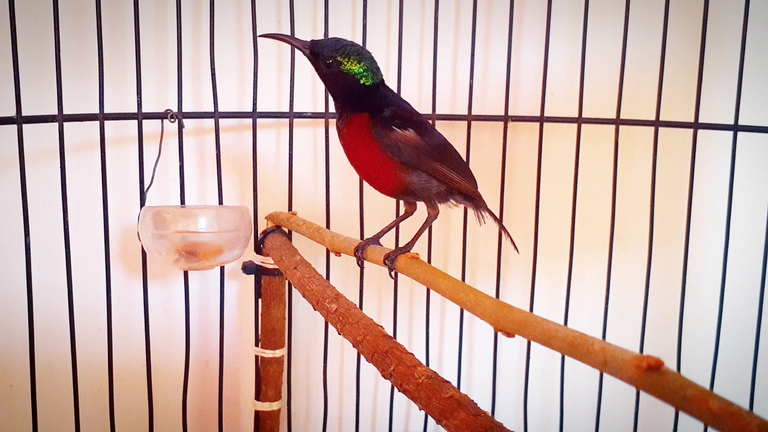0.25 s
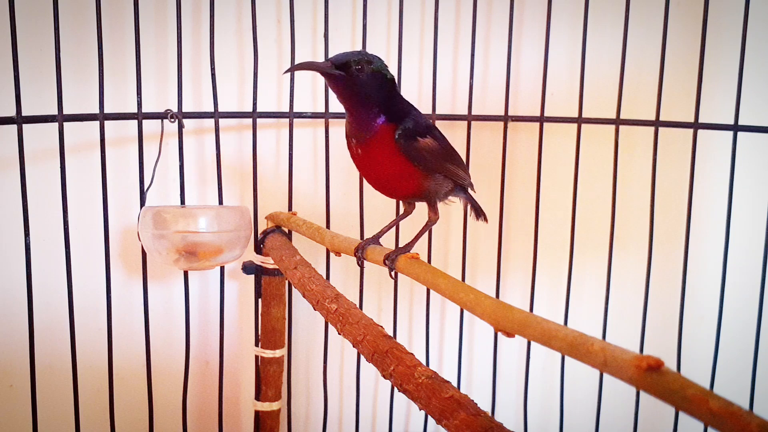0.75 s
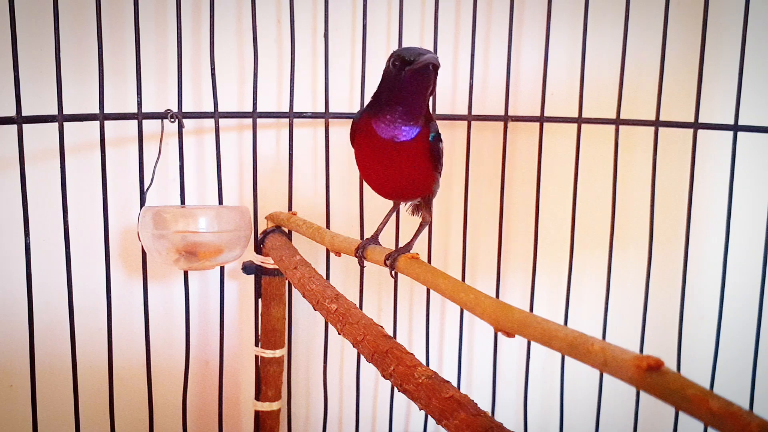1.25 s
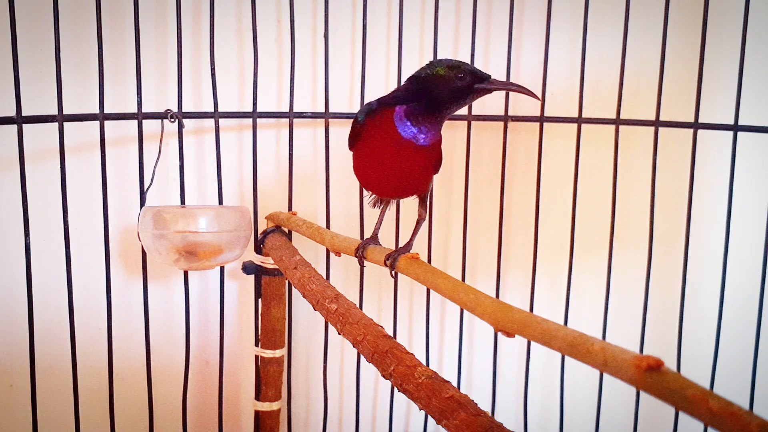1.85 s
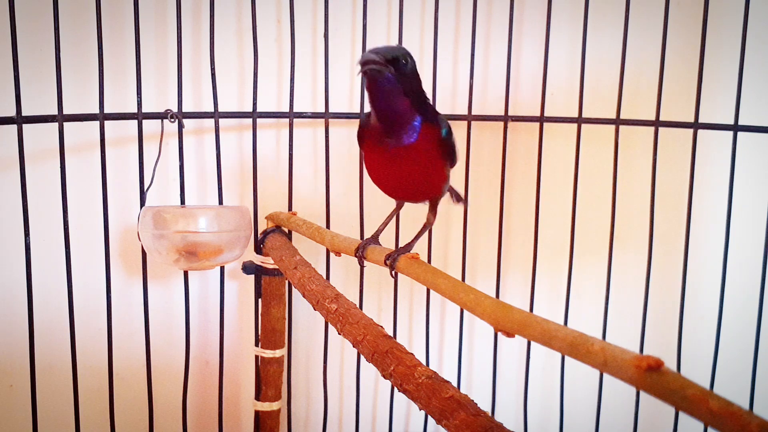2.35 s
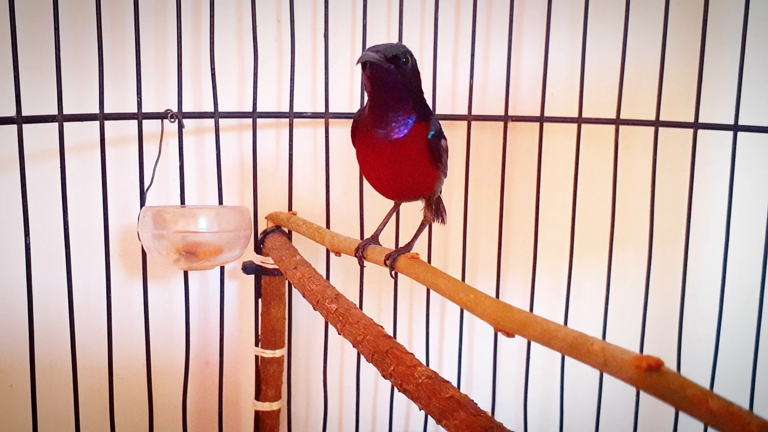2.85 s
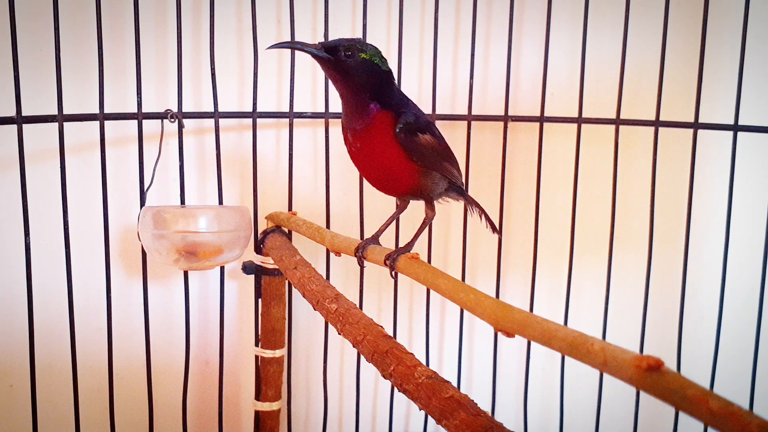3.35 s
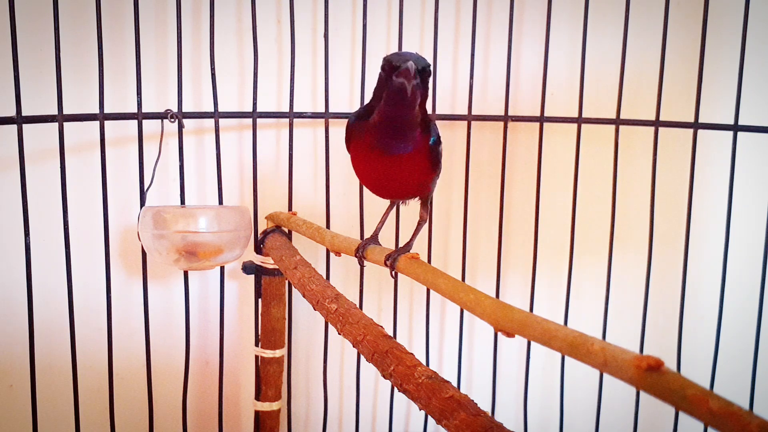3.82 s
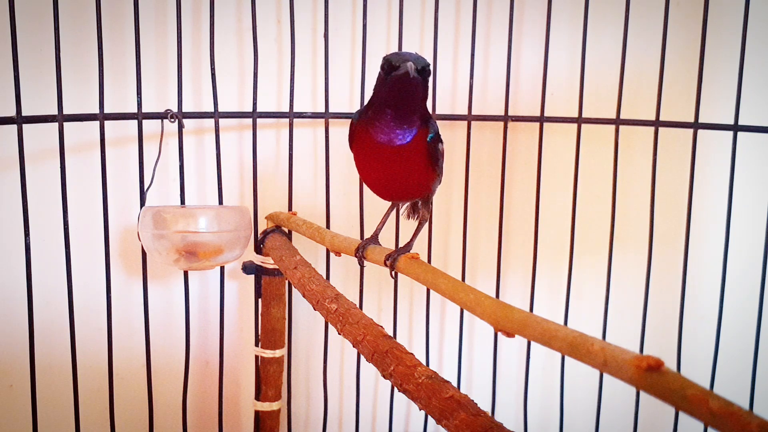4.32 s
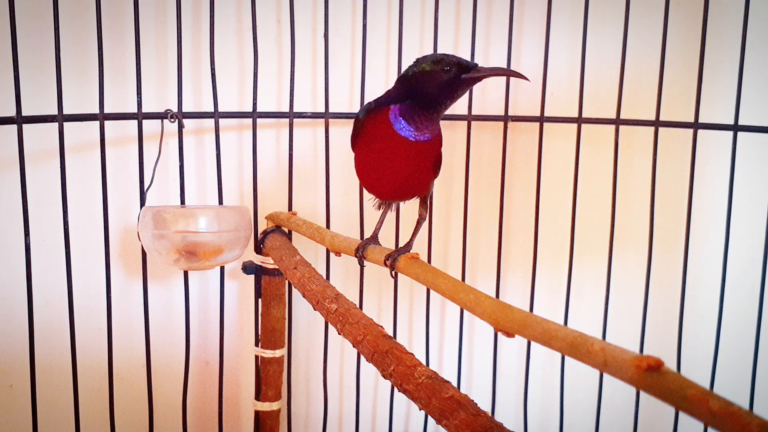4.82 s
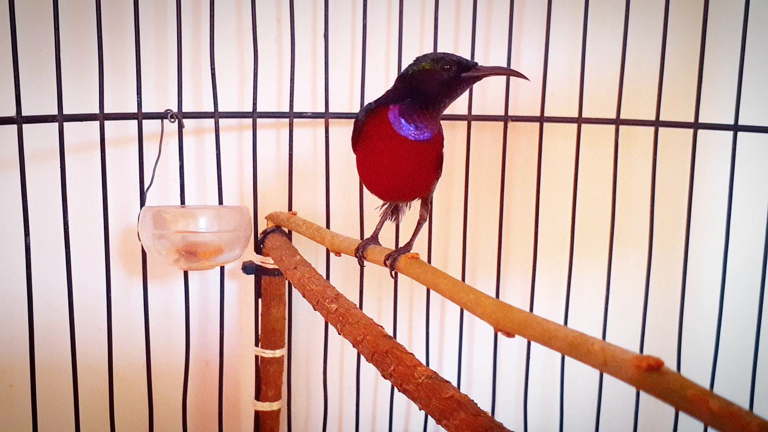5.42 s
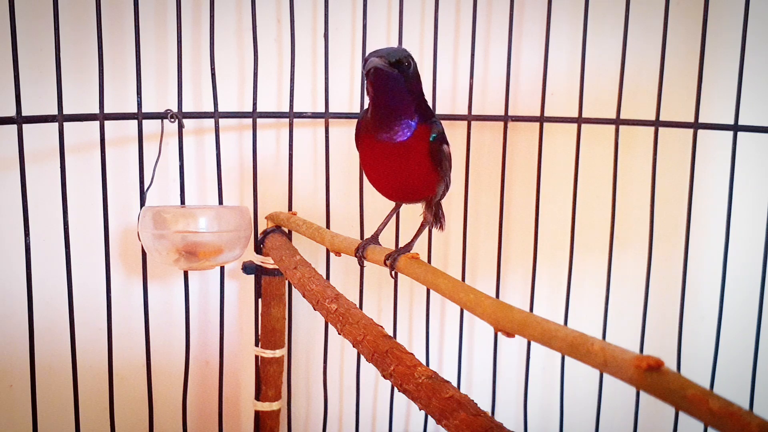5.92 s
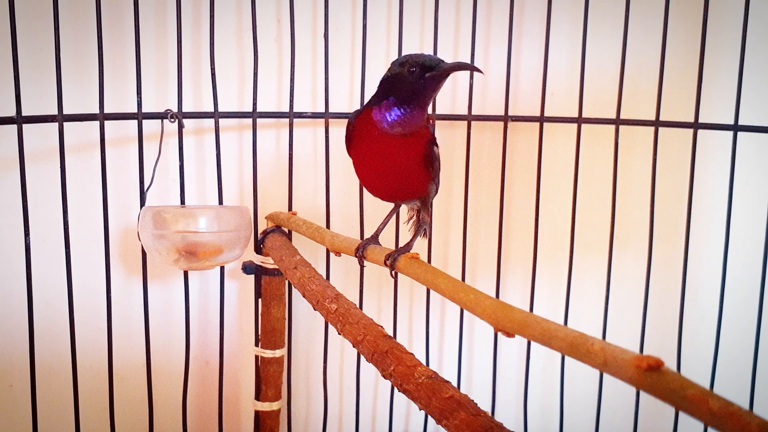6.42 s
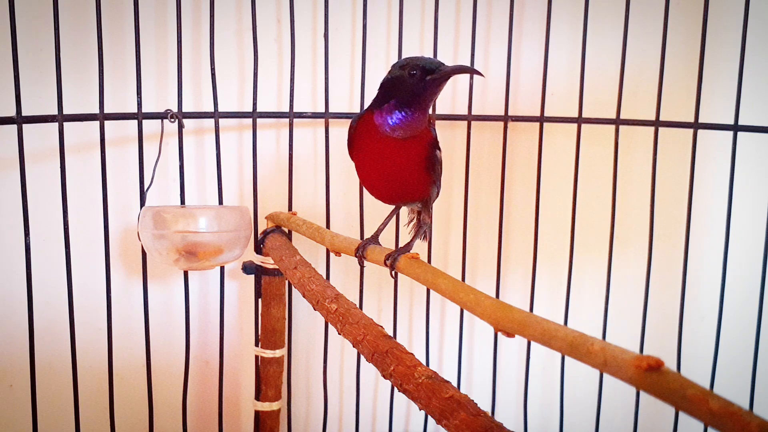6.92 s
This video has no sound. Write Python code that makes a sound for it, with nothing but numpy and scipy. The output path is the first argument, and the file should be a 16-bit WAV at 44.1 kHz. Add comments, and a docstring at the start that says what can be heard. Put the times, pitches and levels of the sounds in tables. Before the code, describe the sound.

A quiet small room, with a caged sunbird very close to the microphone. Soft low rumble swells and ebbs beneath a faint wavering hum, street noise and thin hiss. From 0 to 2 s, far outdoor birds twitter faintly, with four quick falling chirps at 0.4-0.8 s, blurred by echoes. At 0.9 s the sunbird gives a loud, piercing squeal of about 0.2 s, rough and two-voiced, splitting midway, arching upward and dropping off. A near-identical squeal comes at 2.3 s. At 3.75 and 3.95 s come two even shorter, bright whistles, about 0.1 s each, shooting steeply upward. A third squeal sounds at 5.5 s. Each call leaves a short, faint room ring. Dull, muffled knocks are scattered throughout, barely audible. From 5.9 s to the end near 7 s, a distant bird repeats buzzy rising chirps about five per second, fading.

```python
"""A sunbird calls from its perch in a small room, close to a phone: three two-voiced squeals and two rising whistles.
Both sides of its syrinx sing at once and mix into sum and difference tones that the throat colours.
Far birds outdoors chirp in quick buzzy glides, heard mostly through diffuse echoes.
Soft dull knocks are resonant noise bursts; a low rumble, street noise, hiss and a wavering hum lie underneath."""
import sys
import numpy as np
from scipy import signal
from scipy.fft import rfft, irfft, next_fast_len
from scipy.io import wavfile
from scipy.ndimage import uniform_filter1d

SR = 44100
rng = np.random.default_rng(int(sys.argv[2]) if len(sys.argv) > 2 else 0)


def transcribe(u):
    """Save the signal u as a 16-bit wav file named by the first command-line argument.

    u: samples, shape (n,) or (channels, n), limited to [-1, 1]; the rate is SR.
    q: integer samples, one column per channel.
    """
    v = np.clip(np.atleast_2d(u).T, -1, 1)
    q = np.round(v * 32767).astype(np.int16)
    wavfile.write(sys.argv[1], SR, q)


N = 316197
T = np.arange(N) / SR


def undb(db):
    """Amplitude ratio of a level: 20 dB are a factor of ten."""
    return 10 ** (np.asarray(db) / 20)


def unit(x):
    """Normalisation to equal power: the signal scaled to rms 1."""
    return x / np.sqrt(np.mean(x ** 2))


def colour_db(table, hz):
    """Frequency response: level of a (Hz, dB) table, interpolated on a log-frequency axis."""
    f, db = np.transpose(table)
    return np.interp(np.log(np.maximum(hz, 1)), np.log(f), db)


def coloured(n, db_of):
    """Spectral shaping: white noise weighted by the level db_of(Hz), scaled to rms 1."""
    m = next_fast_len(n)
    spectrum = rfft(rng.standard_normal(m))
    gain = undb(db_of(np.fft.rfftfreq(m, 1 / SR)))
    return unit(irfft(spectrum * gain, m)[:n])


def wobble(n, hz):
    """Low-passed noise: random wavering up to about hz, rms 1."""
    return coloured(n, lambda f: -20 * np.log10(1 + (f / hz) ** 2))


def smooth(x):
    """Moving average over 130 samples (3 ms), which rounds the corners of a control curve."""
    return uniform_filter1d(x, size=130, mode="nearest")


def tail(t60_s, hold_s):
    """Diffuse reverberation: reflections of total energy 1 build up, hold, then decay 60 dB in t60_s."""
    t = np.arange(int((hold_s + 1.5 * t60_s) * SR)) / SR
    decay = undb(-60 * np.maximum(t - hold_s, 0) / t60_s)
    buildup = np.minimum(t / 0.0047, 1)
    h = rng.standard_normal(len(t)) * decay * buildup
    return h / np.sqrt(np.sum(h ** 2))


def add(out, x, s):
    """Superposition: sound x joins the mix at s seconds."""
    i = int(s * SR)
    out[i:i + len(x)] += x[:len(out) - i]


def floor():
    """Band-split noise: two rumbles swell on their own, street noise stirs in bands, hiss is steady, a hum wavers."""
    # Spectrum of the background. Each row: frequency in Hz, relative level in dB.
    floor_colour = [(13, -67), (27, -20.5), (80, 1.5), (100, -9), (120, -16), (160, -13), (203, -19.5),
                    (233, -26), (275, -22.5), (342, -37), (739, -40.5), (1060, -39.5), (1240, -41),
                    (1780, -41), (3530, -46.5), (15600, -51)]
    # Swells. Each row: time in seconds, level of the deep and of the upper rumble in dB.
    rumble_swells = [(0.0, -56.5, -59.5), (0.26, -56, -56.5), (1.08, -53, -56), (2.06, -57, -66.5),
                     (2.56, -50.5, -63.5), (2.93, -54.5, -64.5), (3.09, -56, -65.5), (3.41, -56, -59),
                     (4.09, -51, -59.5), (4.41, -56, -65.5), (5.47, -55.5, -62.5), (5.69, -49, -52.5),
                     (5.91, -59.5, -57.5), (6.77, -49, -60.5), (7.17, -55, -61.5)]
    floor_db, stir_db = -52.5, 1.9  # level of the whole spectrum; rms unevenness of the street noise
    hum_hz, hum_peak_db = 86, -61.5

    s, deep_db, upper_db = np.transpose(rumble_swells)
    noise = undb(floor_db) * coloured(N, lambda f: colour_db(floor_colour, f))
    edges_hz = (135., 380., 700., 1100., 1600., 2200., 3000.)
    below = [signal.sosfiltfilt(signal.butter(3, hz, fs=SR, output="sos"), noise) for hz in edges_hz]
    deep = unit(below[0]) * undb(np.interp(T, s, deep_db))
    upper = unit(below[1] - below[0]) * undb(np.interp(T, s, upper_db))
    street = sum(band * undb(stir_db * wobble(N, 3.3)) for band in np.diff(below[1:], axis=0))
    hiss = noise - below[-1]
    hum_gain = undb(hum_peak_db + 1.9 * wobble(N, 2.7))
    hum_turn = 2 * np.pi * np.cumsum(hum_hz + 1.5 * wobble(N, 0.68)) / SR
    return deep + upper + street + hiss + hum_gain * np.sin(hum_turn)


def knocks():
    """Damped resonance: muffled noise bursts, each in one band that is broader the higher it lies, blurred by distance."""
    # Each row: start in seconds, centre in Hz, level before the envelope in dB, time scale in seconds.
    knock_rows = [(0.243, 1720, -64, 0.11), (0.929, 735, -50.5, 0.13), (1.222, 1770, -65, 0.26),
                  (1.521, 850, -67.5, .07), (1.598, 1037, -68.5, 0.12), (2.229, 1700, -63, 0.3),
                  (2.729, 1900, -63, 0.37), (3.01, 740, -68.5, 0.1), (3.212, 1176, -65.5, 0.09),
                  (3.242, 1780, -65, 0.17), (4.332, 577, -63, 0.062), (4.563, 1067, -68, 0.079),
                  (5.221, 1803, -66, 0.15), (5.879, 1172, -63, 0.14), (6.232, 623, -67, 0.1),
                  (6.255, 1844, -61.5, 0.22)]
    width_1khz_hz, widening = 150, 2.5  # resonance width at 1 kHz; power of pitch by which it grows

    out = np.zeros(N)
    for s, hz, db, length in knock_rows:
        width = width_1khz_hz * (hz / 1000) ** widening
        u = np.arange(int(1.8 * length * SR)) / (length * SR)
        burst = coloured(len(u), lambda f: -20 * np.log10(1 + (2 * (f - hz) / width) ** 2))
        envelope = 5 * u * np.exp(1 - 5 * u ** 0.72)
        add(out, undb(db) * burst * envelope, s)
    return out


def far_birds():
    """Frequency modulation: buzzy glides bend towards their last pitch, mostly heard through outdoor echoes."""
    # Steep falling sweeps. Each row: start in seconds, top pitch in Hz, level in dB.
    sweeps = [(0.441, 6160, -62), (0.577, 6220, -59), (0.694, 6400, -63), (.81, 5970, -59),
              (2.933, 5750, -71), (3.55, 5180, -66)]
    # Buzzy rising chirps. Each row: start in seconds, bend of the rise (exponent), level in dB.
    chirps = [(5.889, 2.5, -62), (6.11, 3.1, -65.5), (6.312, 1.65, -61), (6.513, 1.72, -60.5),
              (6.702, 1.6, -62.5), (6.9, 2.33, -65.5), (7.085, 2.5, -70.5)]
    # Short twitters. Each row: start in seconds, first pitch in Hz, last pitch in Hz, level in dB.
    twitters = [(.02, 4690, 3720, -66), (0.157, 3130, 3950, -66.5), (0.33, 4600, 3500, -67),
                (1.295, 3550, 3800, -62), (1.485, 3490, 3430, -66.5), (1.54, 3390, 3490, -66.5),
                (1.735, 3700, 3380, -66), (1.888, 5730, 3300, -66), (2.621, 3486, 3500, -70),
                (2.68, 3850, 3996, -67), (3.109, 3346, 3956, -67.5), (3.33, 3110, 3480, -66),
                (3.498, 3216, 3063, -71.5), (3.7, 3380, 3600, -66.5), (5.335, 2860, 3410, -57.5),
                (5.369, 3140, 3870, -68.5), (5.405, 4470, 4750, -63.5)]
    direct_db, t60_s, hold_s = -8, .22, .035  # direct sound and outdoor echoes
    fade_db = -6  # over a sweep or chirp

    # length s, first Hz, last Hz, buzz Hz, bend, fade dB, level dB follow each start
    notes = [(s, 0.021, hz, 3500, 80, 0.87, fade_db, db) for s, hz, db in sweeps]
    notes += [(s, .125, 3100, 4490, 270.6, bend, fade_db, db) for s, bend, db in chirps]
    notes += [(s, 0.04474, from_hz, to_hz, 190, 1.8, 0, db) for s, from_hz, to_hz, db in twitters]
    dry = np.zeros(N)
    for s, length, from_hz, to_hz, buzz_hz, bend, fall_db, db in notes:
        u = np.arange(int(length * SR)) / (length * SR)
        path = from_hz + (to_hz - from_hz) * (1 - (1 - u) ** bend)
        hz = path + buzz_hz * np.tanh(wobble(len(u), 250.))
        swell = np.minimum(np.minimum(u, 1 - u) / .12, 1) * undb(db + fall_db * u)
        add(dry, swell * np.sqrt(2) * np.sin(2 * np.pi * np.cumsum(hz) / SR), s)
    return undb(direct_db) * dry + signal.fftconvolve(dry, tail(t60_s, hold_s))[:N]


LEAP_S = 0.0099  # time taken to leap when the voices part


def glide(t, stage, parting, law):
    """Membrane tension sets pitch: it settles, leaps at the parting, bends to the crest, then drops away."""
    onset_hz, settled_hz, before_hz, after_hz, crest_hz, end_hz, rise, fall = law
    opening = np.interp(stage, [0, .3, 1], [onset_hz, settled_hz, before_hz])
    to_crest = (crest_hz - after_hz) * (1 - (1 - np.clip(stage - 1, 0, 1)) ** rise)
    to_end = (end_hz - crest_hz) * np.clip(stage - 2, 0, 1) ** fall
    arch = after_hz + to_crest + to_end
    return opening + (arch - opening) * np.clip((t - parting) / LEAP_S + .5, 0, 1)


def call(laws, effort, locking, onset, parting, crest, end, pitch, db, hoarse_onset, hoarse_parting, overshoot):
    """Intermodulation of two vibrating membranes, unsteady at the onset and where the voices part."""
    # Tones of the free voices. Each row: multiple of the low pitch, multiple of the high pitch.
    multiples = [(1, 0), (2, 0), (3, 0), (4, 0), (0, 1), (0, 2), (0, 3), (1, 1), (2, 1), (1, 2), (-1, 1),
                 (2, -1), (3, -1), (4, -1), (-1, 2), (-2, 3), (4, -2), (5, 0), (0, 4), (2, 2), (3, 1),
                 (4, 1), (1, 3), (3, 2)]
    # One relative level in dB for each of those tones.
    tone_levels = [1.85, -4, -16, -26.5, -1.12, -13.5, -20, -18.5, -11, -16, -28.5, -11.5, -16.5, -24, -15,
                   -18.5, -16, -8.5, -18, -18, -18, -14, -20, -16]
    # Relative levels in dB of the one series, on half the low pitch, that locked voices share.
    locked_levels = [-14.5, 0.3, 8.5, 1, -10, -13, -16.5, -28, -17.5]
    # Resonances of the throat. Each row: frequency in Hz, gain in dB.
    throat = [(600, -35.5), (1000, -14.5), (1800, -2.5), (3000, 0.5), (4200, 4.5), (5000, 15.5),
              (5450, 20.5), (5700, 11.5), (5950, 16.5), (6400, 8.5), (7300, 6.5), (9000, -5.5),
              (10300, -15.5), (11300, -24), (12400, -15.5), (13300, -19.5), (15500, -13.5)]
    clear_rad, hoarse_rad, rasp_rad = .07, .65, .4  # phase unsteadiness, before each voice's share
    shimmer_db, breath_db = .7, -8.5  # rms level flutter of each tone; breath relative to the low voice

    t = np.arange(onset, end, 1 / SR)
    stage = np.interp(t, [onset, parting, crest, end], np.arange(4))
    knots, low_effort, high_effort = np.transpose(effort)
    low_db = smooth(np.interp(stage, knots, low_effort))
    high_db = smooth(np.interp(stage, knots, high_effort))

    low, high = (smooth(glide(t, stage, parting, law)) for law in laws)
    low = low * (1 + overshoot * np.exp(-((stage - .4) / 0.11) ** 2))
    # locking draws the high voice to 3/2 of the low one until they part
    lock = np.clip(locking, 0, 1) * np.clip(.5 - (t - parting) / LEAP_S, 0, 1)
    high = pitch * (high + lock * (3 * low / 2 - high))
    low = pitch * low

    after_onset = np.exp(-((t - onset) / hoarse_onset) ** 4)
    after_parting = (t > parting) * np.exp(-((t - parting) / hoarse_parting) ** 4)
    hoarse = smooth(after_onset + after_parting)
    slip = clear_rad + hoarse_rad * hoarse
    # the high voice holds its pitch better than the low one
    turn_low = 2 * np.pi * np.cumsum(low) / SR + 1.1 * slip * wobble(len(t), 348.47)
    turn_high = 2 * np.pi * np.cumsum(high) / SR + .35 * slip * wobble(len(t), 348.47)

    def tone(hz, turn, level_db):
        """Source and filter: one partial, weighted by the throat at its pitch."""
        gain_db = level_db + colour_db(throat, hz) + shimmer_db * wobble(len(t), 120.)
        audible = hz < .45 * SR
        return undb(gain_db) * audible * np.sqrt(2) * np.sin(turn + 2 * np.pi * rng.random())

    free = 0
    for (m, n), tone_db in zip(multiples, tone_levels):
        # a mixed tone needs both voices, so it follows the weaker one
        source_db = low_db if n == 0 else high_db if m == 0 else np.minimum(low_db, high_db)
        rasp = rasp_rad * wobble(len(t), 200.) * (m * n < 0)  # difference tones are the least steady
        turn = m * turn_low + n * turn_high + rasp
        free = free + tone(m * low + n * high, turn, source_db + tone_db)
    locked = 0
    for k, level_db in enumerate(locked_levels, 1):
        roughness = .04 * k * k * hoarse * wobble(len(t), 300.)
        locked = locked + tone(k * low / 2, k * turn_low / 2 + roughness, low_db + level_db)
    voiced = np.sqrt(lock) * locked + np.sqrt(1 - lock) * free  # crossfade at constant power

    def breath_colour(f):
        """Weakened throat resonance with a loss above 7.5 kHz."""
        return .55 * colour_db(throat, f) - 3.2 * np.maximum(f / 1000 - 7.5, 0) ** .5

    breath = undb(low_db + breath_db) * (1 + 2.0 * hoarse) * coloured(len(t), breath_colour)
    edges = np.minimum(np.minimum((t - onset) / .008, (end - t) / .003), 1)
    return undb(db) * edges * (voiced + breath)


def sunbird():
    """Direct sound, early reflections and reverberation: all calls with the near walls and the ring of the room."""
    # Effort. Each row: stage (0 onset, 1 voices part, 2 crest, 3 end), relative level of low and high voice in dB.
    squeal_effort = [(0, -55, -52), (.3, -33, -30), (.95, -30, -28), (1.299, -34.5, -20.5),
                     (1.599, -30, -21.5), (1.95, -26, -25), (2.3, -29.5, -20), (2.6, -25.5, -20),
                     (2.85, -27, -33), (2.999, -47, -58.5)]
    whistle_effort = [(0, -51, -56), (.3, -34, -36.5), (.55, -36.5, -32), (.9, -33, -32.5),
                      (1.08, -31.5, -71.5), (1.4, -28.5, -79), (1.55, -27, -79.5), (1.8, -25.5, -81),
                      (2.0, -33, -80.5), (2.6, -27, -80.5), (3, -49.5, -80.5)]
    # Calls. Each row: onset, parting, crest and end in seconds, pitch factor, level in dB,
    # time constants of hoarseness after onset and after parting in seconds, early overshoot of the low pitch (share).
    squeal_rows = [(0.895, .956, 1.054, 1.090, 1.0, -5, 0.036, 0.048, 0.05),
                   (2.329, 2.387, 2.486, 2.521, 1.007, -4.5, 0.027, 0.035, 0.02),
                   (5.53, 5.579, 5.689, 5.723, 1.001, -4.5, 0.013, 0.056, .03)]
    whistle_rows = [(3.761, 3.807, 3.856, 3.868, 1.001, 0.27, 0.02, 0.003965, .01),
                    (3.945, 3.989, 4.039, 4.051, 1.015, 0.46, 0.017, .002, 0.09)]
    # Pitch laws, low voice then high. Each row: onset, settled, before parting, after parting, crest and end
    # pitch in Hz (before the pitch factor, overshoot and locking), exponents of the rise and of the fall.
    squeal_laws = [(2140, 2110, 2070, 2180, 2764, 1150, 2.7, 3.1),
                   (3220, 2800, 3110, 3110, 3730, 2050, 1.1, 2.4)]
    whistle_laws = [(1700, 2400, 2650, 2850, 6175, 6050, 1.5, 3.5),
                    (2300, 3050, 3250, 3200, 3077, 3000, 1.1, 1.1)]
    # One row each: share locked at 2:3 until the voices part, room level in dB.
    squeal_voice = (1, -14.5)
    whistle_voice = (0, -11.5)
    # Near walls. Each row: delay in seconds, level in dB.
    wall_echoes = [(.0046, -23.5), (.011, -18)]

    dry, toward_walls = np.zeros((2, N))
    kinds = ((squeal_laws, squeal_effort, squeal_voice, squeal_rows),
             (whistle_laws, whistle_effort, whistle_voice, whistle_rows))
    for laws, effort, (locking, room_db), rows in kinds:
        for row in rows:
            voice = call(laws, effort, locking, *row)
            add(dry, voice, row[0])
            add(toward_walls, undb(room_db) * voice, row[0])
    out = dry + signal.fftconvolve(toward_walls, tail(t60_s=0.19, hold_s=.004))[:N]
    for delay_s, db in wall_echoes:
        add(out, undb(db) * dry, delay_s)
    # so small a bird sends out next to no bass
    return signal.sosfilt(signal.butter(2, 1300., "high", fs=SR, output="sos"), out)


def scene():
    """Linear superposition of all sources in one channel."""
    return (sunbird() + far_birds() + knocks() + floor())[None]


def record(dry):
    """Saturation and band limit: the phone rounds the loudest peaks and cuts the top above 15650 Hz."""
    dry = dry / (1 + np.abs(dry / .95) ** 6) ** (1 / 6)
    return signal.sosfilt(signal.ellip(10, .2, 60, 15650, fs=SR, output="sos"), dry)


dry = scene()
out = record(dry)
transcribe(out)
```